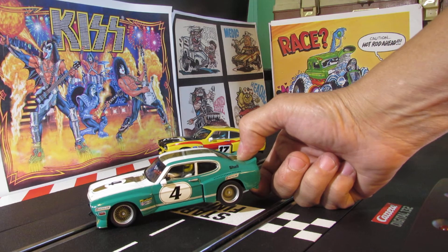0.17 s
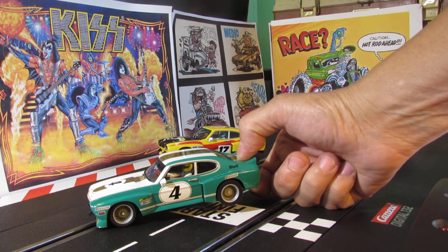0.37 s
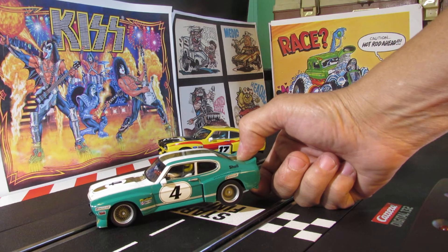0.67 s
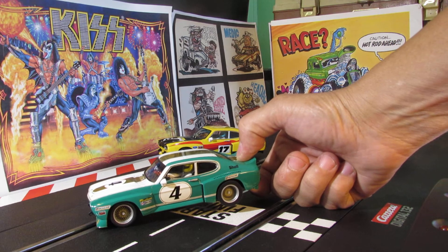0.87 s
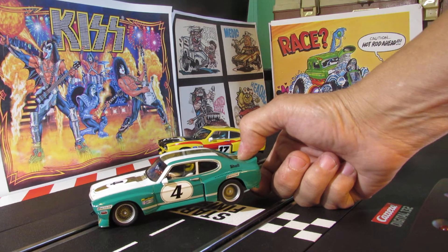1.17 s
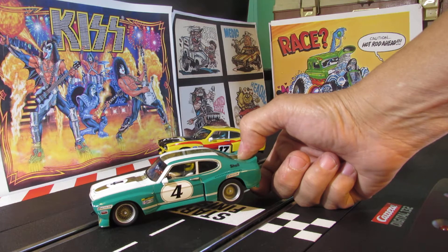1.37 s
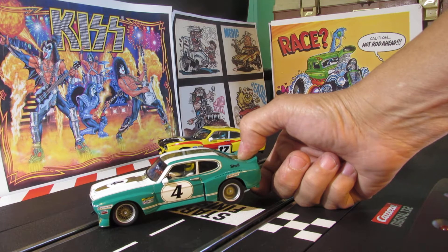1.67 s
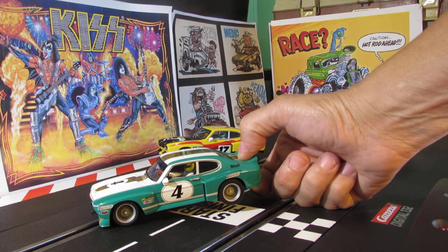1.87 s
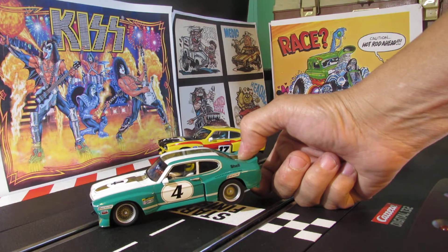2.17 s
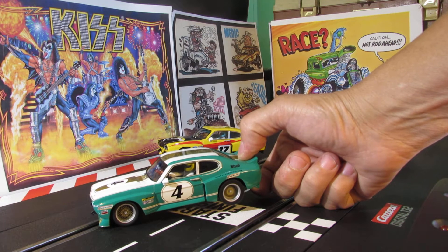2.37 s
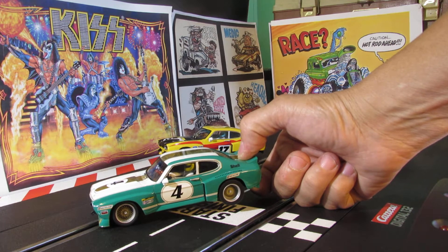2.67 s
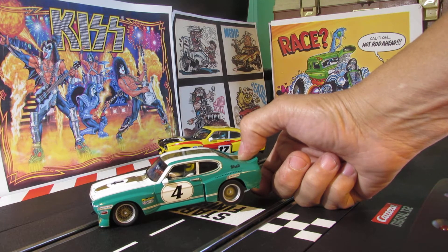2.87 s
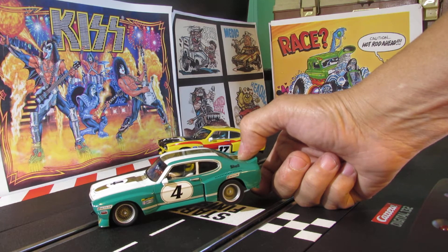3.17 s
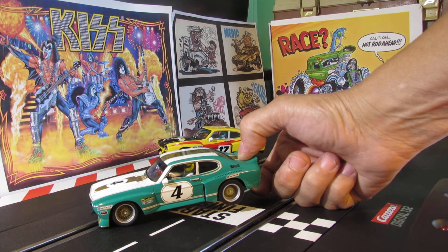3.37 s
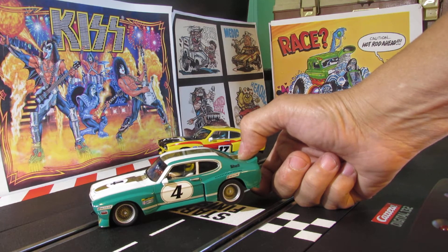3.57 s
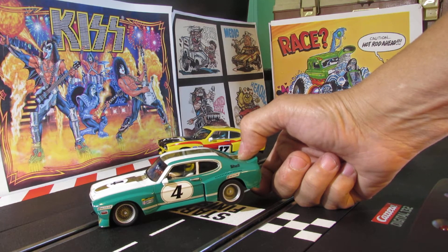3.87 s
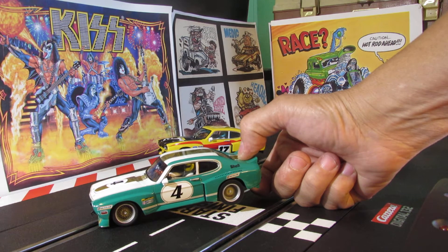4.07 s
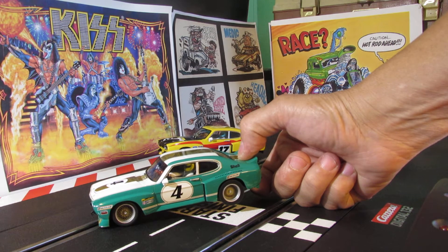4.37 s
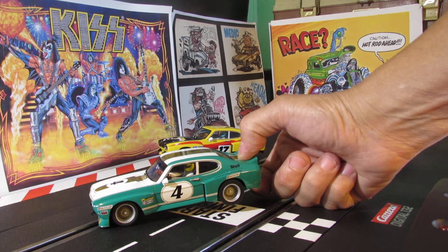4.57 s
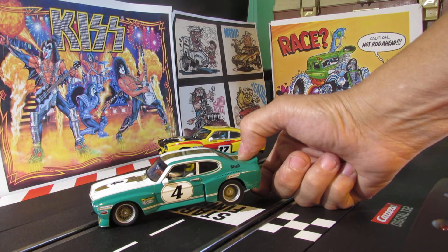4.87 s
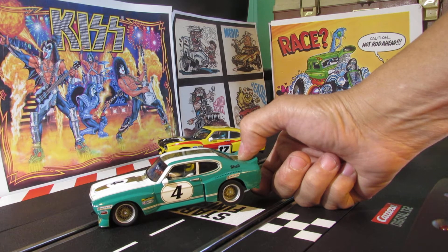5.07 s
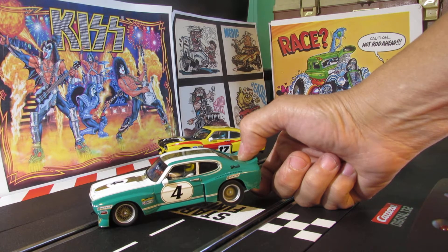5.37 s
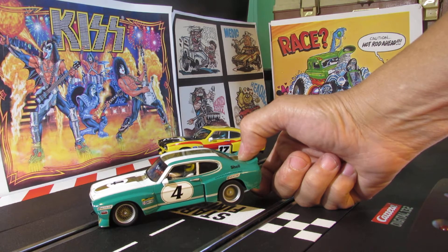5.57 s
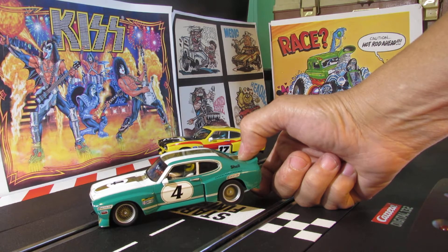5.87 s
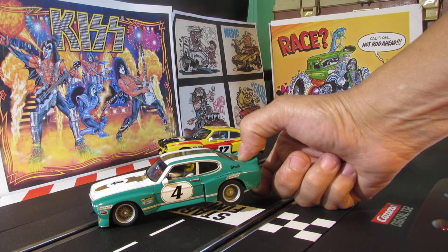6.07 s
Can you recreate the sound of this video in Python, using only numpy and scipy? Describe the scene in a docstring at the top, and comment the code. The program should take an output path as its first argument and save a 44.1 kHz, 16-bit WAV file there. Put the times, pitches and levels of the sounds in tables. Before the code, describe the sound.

Close up, a slot car whirs up instantly to a raspy gear whine, once long, then three shorter revs, each rattling down to a stop.

```python
"""A slot car, rear wheels held off the track, coasts out of a rev, then is revved four times in a small room.
Each rev: a short motor buzz, kicks of the gears, spin-up to a whine, a chirp on release, coast-down.
Rotor and gears are sine banks; pinion teeth knock the plastic shell; brushes and bearings hiss as noise.
The pickup braids tick in the later pauses; reflections and a quiet rumble run throughout.
The whole is softer at first, swells during the first full rev, then holds."""
import sys
import numpy as np
from scipy import signal
from scipy.fft import rfft, irfft
from scipy.io import wavfile

SR = 44100
rng = np.random.default_rng(int(sys.argv[2]) if len(sys.argv) > 2 else 0)


def to_wav(sig):
    """Store sig (one row per channel, or 1-D mono) as 16-bit WAV at the path in sys.argv[1].

    Samples outside -1..1 are clipped; the rate is SR.
    """
    pcm = np.clip(np.atleast_2d(sig), -1, 1) * 32767
    pcm = np.round(pcm).astype(np.int16)
    wavfile.write(sys.argv[1], SR, pcm.T)  # frames by channels


N = 274302
T = np.arange(N) / SR   # time [s]

# throttle presses: (on [s], off [s], coast to rest [s])
THROTTLE_RUNS_S = [(-1, -0.39, .5), (0.204, 2.322, .5), (2.835, 3.14, .54), (3.811, 4.566, .51),
                   (5.163, 5.81, .48)]
# full-throttle speed, wandering slightly, one list per stretch: (time [s], speed [turns/s])
TOP_SPEED_HZ = [
    [(0.5, 131.0), (0.524, 131.9), (1.168, 131.0), (1.328, 132.4), (2.214, 132.4), (2.28, 131.5)],
    [(4.08, 132.2), (4.136, 132.5), (4.28, 131.3), (4.304, 134.1), (4.324, 132.3), (4.54, 131.9)],
    [(5.4, 132.1), (5.582, 132.1), (5.628, 133.6), (5.79, 133.2)],
]
# rotor and gear tones at full speed: (multiple of turning rate, relative level [dB])
WHINE_DB = [(1, -25.5), (2, -24.5), (3, -6.5), (4, -12), (6, -20), (7, -15), (8, 0), (9, -0.5), (10, -1.5),
            (11, 0), (12, -4.5), (13, -2), (15, -2.5), (17, -7), (18, -14), (19, -10), (21, -8), (24, -26),
            (25, -5.5), (27, -5), (28, -7.5)]
# force of each pinion tooth in turn: (relative force [dB])
TOOTH_FORCE_DB = [2.5, -3, 2, 2, -4, 2, -4, 1, -1.5]
# broad response of shell and chassis: (frequency [Hz], relative level [dB])
SHELL_DB = [(200, -38), (330, -22), (560, -12.5), (690, -34.5), (880, -19.5), (1100, -22.5), (1500, -7),
            (1850, -23), (3000, -2.5), (3900, -10), (4900, -21), (7200, -17), (15000, -21.5)]
# shell resonances on top of it: (centre [Hz], width [Hz], boost [dB])
SHELL_MODES_HZ_DB = [(615, 36, 6.5), (751, 97, 11.5), (1052, 143, 14.5), (1185, 147, 12), (1323, 113, 12.5),
                     (1539, 200, 9), (1620, 68, 8), (1734, 28, 10), (1837, 155, 13), (2001, 276, 14),
                     (2223, 310, 8), (2470, 150, 5.5), (3750, 220, 1.5), (5110, 570, 4), (7010, 780, 4),
                     (8050, 170, 2.5), (10660, 1440, 4), (12300, 370, -1), (13280, 500, 9.5),
                     (13650, 410, 3)]
# chassis sway on guide and holding finger: (frequency [Hz], relative level [dB])
SWAY_DB = [(50, -33), (90, -26), (120, 6.5), (165, -22), (215, 9.5), (270, -2), (400, -28), (1500, -65)]
# side level by frequency, nearly mono at 2-6 kHz, wide in the treble: (frequency [Hz], relative level [dB])
WIDTH_DB = [(130, 3), (400, -10), (800, -29.5), (1050, -3), (1500, -14.5), (2000, -99), (3600, -56),
            (5800, -33), (7000, 2), (15000, 2.5)]
# room rumble spectrum: (frequency [Hz], relative density [dB per Hz])
RUMBLE_SPECTRUM_DB = [(25, -2), (45, -0.5), (130, -6), (300, -8), (700, -19), (1400, -23.5), (3000, -36),
                      (6000, -36), (15000, -41)]
# gain of the whole sound: (time [s], gain [dB])
SWELL_GAIN_DB = [(0.3, -7.5), (1.95, 0)]
# stalled motor buzzes at first touch of throttle: (centre [s], length [s], relative level [dB])
BUZZES_S_DB = [(.153, 0.045, -52), (2.79, .04, -56), (3.775, 0.05, -51), (5.095, 0.028, -45)]
# resonances woken by the buzz: (centre [Hz], width [Hz], relative level [dB])
BUZZ_MODES_HZ_DB = [(1430, 280, 0), (2730, 490, -6), (4100, 400, -4), (4660, 380, -4)]
# gears knock across their play at start or coast: (time [s], relative peak [dB])
KICKS_S_DB = [(0.204, -18), (0.216, -12), (2.5496, -9), (2.596, -9), (2.8349, -12), (3.3715, -17),
              (3.4158, -14), (3.8108, -13), (4.9014, -22), (5.1428, -19), (5.1637, -13)]
# bearing chirps as throttle is let go: (centre [s], length [s], relative level [dB])
CHIRPS_S_DB = [(2.31, .035, -27), (3.13, 0.038, -23), (4.56, .035, -27), (5.793, .03, -23)]
# resonances of the chirp: (centre [Hz], width [Hz], relative level [dB])
CHIRP_MODES_HZ_DB = [(3600, 700, -6), (4400, 600, -9), (5400, 550, -7)]
# pickup braids tick on the rails: (time [s], relative peak [dB])
TICKS_S_DB = [(3.5279, -24), (3.6875, -42), (3.7474, -40), (4.9791, -38), (5.0769, -37), (5.0984, -39)]

FULL_SPEED_HZ = 132.5   # turning rate at which WHINE_DB holds
SPIN_UP_S = .044   # time constant of the rise to full speed
# relative levels; each power is the exponent of growth with pace
GEAR_DB, GEAR_POWER = -19.1, 1.62
SIZZLE_DB, SIZZLE_POWER = -24.1, 2.6
DRIVE_DB = -30.5   # gears grinding under starting torque
RUMBLE_DB = -49.2
CUTOFF_HZ = 15200


def from_db(db):
    """Decibels to gain."""
    return 10 ** (np.asarray(db) / 20)


def rms_one(x):
    """Scale to unit rms."""
    return x / np.sqrt(np.mean(x ** 2) + 1e-20)


def noise():
    """White noise of unit rms."""
    return rng.standard_normal(N)


def in_time(rows):
    """Interpolate (time, value) rows at every sample."""
    return np.interp(T, *np.transpose(rows))


def at_hz(points, hz):
    """Read a dB spectrum on a log-frequency axis."""
    at, db = np.transpose(points)
    return np.interp(np.log(hz + 1), np.log(at), db)


def drift(rate_hz):
    """Smooth random curve, spread about 1, with rate_hz knots per second."""
    knots = rng.standard_normal(4000)
    return np.interp(T * rate_hz, np.arange(len(knots)), knots) * np.sqrt(3 / 2)


def colour(x, response_db, size=8192):
    """Minimum-phase filter of the given response, unit power gain for white noise."""
    cepstrum = irfft(np.log(from_db(response_db(np.fft.rfftfreq(size, 1 / SR)))))
    # fold the cepstrum onto positive time: causal
    cepstrum[1:size // 2] *= 2
    cepstrum[size // 2 + 1:] = 0
    impulse = irfft(np.exp(rfft(cepstrum)))
    return signal.fftconvolve(x, impulse / np.linalg.norm(impulse))[:N]


def edge(x, hz, kind, order=2):
    """Butterworth high- or low-pass."""
    sos = signal.butter(order, min(hz, SR / 2 - 1), kind, fs=SR, output="sos")
    return signal.sosfilt(sos, x)


def resonance(hz, centre_hz, width_hz):
    """Resonance curve, 1 at its centre."""
    return 1 / (1 + (2 * (hz - centre_hz) / width_hz) ** 2)


def shell_db(hz):
    """Response of the car's body, too small to radiate deep bass."""
    peaks_db = sum(db * resonance(hz, centre, width) for centre, width, db in SHELL_MODES_HZ_DB)
    bass_loss_db = 10 * np.log10(1 + (170 / (hz + 1)) ** 2)
    return at_hz(SHELL_DB, hz) + peaks_db - bass_loss_db


def throttle():
    """Shares of full speed and torque: exponential approach to top speed, then even slowing by friction."""
    pace, torque = np.zeros(N), np.zeros(N)
    for on_s, off_s, coast_s in THROTTLE_RUNS_S:
        lag = np.exp(-np.maximum(T - on_s, 0) / SPIN_UP_S)
        coast = np.clip(1 - (T - off_s) / coast_s, 0, 1)
        pace += (1 - lag) * coast
        torque += lag * (T >= on_s) * (T < off_s)
    return np.minimum(pace, 1), torque


def whine(speed_hz, turns, waver_db, slip_rad, flutter_rad):
    """Rotor and gear tones glide through the shell's resonances as the speed changes."""
    grid_hz = np.arange(0, SR / 2, 2)
    body_db = shell_db(grid_hz)
    angle = 2 * np.pi * turns + flutter_rad * drift(90)   # gear play shakes the rotor
    rotor, gears = np.zeros(N), np.zeros(N)
    for multiple, db in WHINE_DB:
        here_db = np.interp(multiple * speed_hz, grid_hz, body_db)
        full_speed_db = np.interp(multiple * FULL_SPEED_HZ, grid_hz, body_db)
        gain_db = db + np.minimum(here_db - full_speed_db, 2)   # limit: no single tone whistles out
        phase = multiple * angle + rng.uniform(0, 2 * np.pi)
        if multiple < 8:
            rotor += from_db(gain_db + .5 * waver_db * drift(8.9)) * np.sin(phase)
        else:
            gears += from_db(gain_db + waver_db * drift(9)) * np.sin(phase + slip_rad * drift(11))
    return rotor, gears


def rattle(speed_hz, turns, scatter_db, wobble_db, hiss_db):
    """Each pinion tooth knocks and rubs; the slightly eccentric shaft presses harder once a turn."""
    teeth = len(TOOTH_FORCE_DB)
    tooth = np.floor(teeth * turns + .12 * drift(500)).astype(int)
    meets = np.diff(tooth, prepend=tooth[0]) > 0
    force_db = np.take(TOOTH_FORCE_DB, tooth % teeth) + scatter_db * np.clip(noise(), -2, 2)
    knocks = meets * rng.choice([-1, 1], N) * from_db(force_db)
    # slow teeth knock more rarely; each knock is raised to even out the power
    knocks = rms_one(knocks / np.sqrt(speed_hz + 10))
    pressure = from_db(wobble_db * np.sin(2 * np.pi * turns))
    return rms_one(pressure * (knocks + from_db(hiss_db) * noise()))


def gear_knocking(pace, speed_hz, turns, level):
    """Tooth knocks ring the shell; slow knocks are soft and wake only its lower resonances."""
    lurch = from_db(2.54 * (1 - pace) * drift(70))   # unloaded gears bounce unevenly
    teeth = rattle(speed_hz, turns, scatter_db=2.2, wobble_db=2.6, hiss_db=-4.5)
    knocking = colour(level * lurch * teeth, shell_db)
    hardness = np.minimum(0.14 + 0.92 * pace, 1)
    hard = edge(knocking, 5670, "low", order=4)
    soft = edge(knocking, 1350, "low")
    return from_db(-1.92) * hardness * hard + from_db(8.5) * (1 - hardness) * soft


def brush_sizzle(pace, speed_hz, turns):
    """Brushes and bearings hiss through the shell, growing steeply with speed."""
    treble = from_db(SIZZLE_DB) * pace ** SIZZLE_POWER
    rubbing = rattle(speed_hz, turns, scatter_db=3.5, wobble_db=1.5, hiss_db=1.5)
    sizzle = colour(treble * rubbing, shell_db)
    return from_db(9.0) * edge(sizzle, 4100, "high", order=4)


def chassis_sway(pace, turns, level):
    """Rotor imbalance and noise shake the chassis, most strongly near three quarters of full speed."""
    imbalance = np.sin(2 * np.pi * turns) + from_db(-11) * np.sin(4 * np.pi * turns)
    passing = 0.032 + np.exp(-((pace - .75) / 0.14) ** 2)
    shake = level * passing * (noise() + from_db(-22) * imbalance)
    return from_db(-23.5) * colour(shake, lambda hz: at_hz(SWAY_DB, hz))


def motor():
    """Tonal part (whine, sway) and noisy part (knocking, sizzle), all driven by the rotor's speed."""
    pace, torque = throttle()
    speed_hz = pace * in_time(np.vstack(TOP_SPEED_HZ))
    turns = np.cumsum(speed_hz) / SR
    level = from_db(GEAR_DB) * pace ** GEAR_POWER + from_db(DRIVE_DB) * np.sqrt(torque)
    rotor, gears = whine(speed_hz, turns, waver_db=1.5, slip_rad=.3, flutter_rad=.008)
    meshing = pace ** 4   # only fast gears sing; slow ones clatter
    tones = level * (from_db(-8.5) * rotor * pace + from_db(-9.0) * gears * meshing)
    tones += chassis_sway(pace, turns, level)
    clatter = gear_knocking(pace, speed_hz, turns, level) + brush_sizzle(pace, speed_hz, turns)
    return tones, clatter


def room(x, t60_s, gap_s):
    """Diffuse reflections from track, backdrop and walls: decaying noise after a gap."""
    t = T[:SR // 2]
    tail = rng.standard_normal(len(t)) * from_db(-60 * t / t60_s) * (t > gap_s)
    return signal.fftconvolve(x, tail / np.linalg.norm(tail))[:N]


def room_rumble():
    """Steady low-weighted noise of the room, independent in mid and side."""
    near, wide = (edge(colour(noise(), lambda hz: at_hz(RUMBLE_SPECTRUM_DB, hz)), 32, "high", order=4)
                  for _ in range(2))
    gain = from_db(RUMBLE_DB)
    return gain * near, from_db(4.5) * gain * edge(wide, 1000, "low")


def squeals(events, modes):
    """Brief swells of scratchy noise in a few resonances."""
    swell = sum(from_db(db) * np.exp(-2 * (2 * (T - s) / length_s) ** 2) for s, length_s, db in events)

    def response_db(hz):
        return 20 * np.log10(sum(from_db(db) * resonance(hz, centre, width) for centre, width, db in modes))
    return swell * colour(noise(), response_db)


def motor_buzzes():
    """The stalled motor wakes its resonances at the first touch of the throttle."""
    return squeals(BUZZES_S_DB, BUZZ_MODES_HZ_DB)


def bursts(events, decay_s):
    """A dying puff of noise for each contact."""
    envelope = sum(from_db(db) * (T >= s) * np.exp(-np.abs(T - s) / decay_s) for s, db in events)
    return envelope * noise()


def gear_kicks():
    """Gears knock across their play and ring the shell."""
    return from_db(-13.5) * colour(bursts(KICKS_S_DB, decay_s=0.0044), shell_db)


def bearing_chirps():
    """A bearing chirps in its resonances as the throttle is let go."""
    return squeals(CHIRPS_S_DB, CHIRP_MODES_HZ_DB)


def braid_ticks():
    """Pickup braids tick on the rails: very short, treble only."""
    return from_db(-5.5) * edge(bursts(TICKS_S_DB, decay_s=0.0012), 5000, "high")


def scene():
    """The car close in front, its reflections around it, over a quiet rumble."""
    tones, clatter = motor()
    clatter += motor_buzzes() + gear_kicks() + bearing_chirps() + braid_ticks()
    mid = tones + clatter + from_db(-7.5) * room(clatter, t60_s=0.3, gap_s=0.00318)
    around = room(tones + clatter, t60_s=0.088, gap_s=.001)
    side = from_db(-6) * colour(around, lambda hz: at_hz(WIDTH_DB, hz))
    rumble_mid, rumble_side = room_rumble()
    mid, side = mid + rumble_mid, side + rumble_side
    return from_db(in_time(SWELL_GAIN_DB)) * np.array([mid + side, mid - side])


def record(dry):
    """Steep elliptic low-pass at the top of the band."""
    return signal.sosfilt(signal.ellip(12, .1, 90, CUTOFF_HZ, fs=SR, output="sos"), dry)


dry = scene()
out = record(dry)
to_wav(out)
```